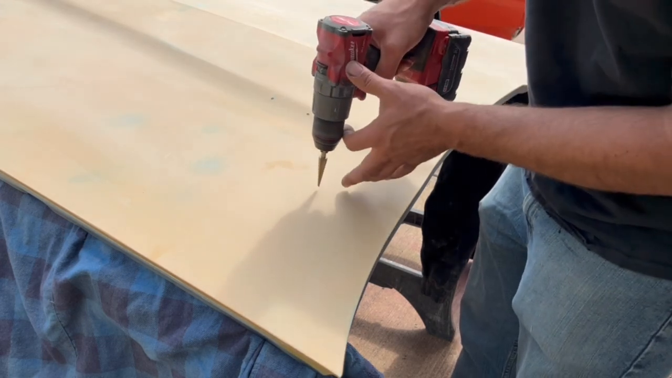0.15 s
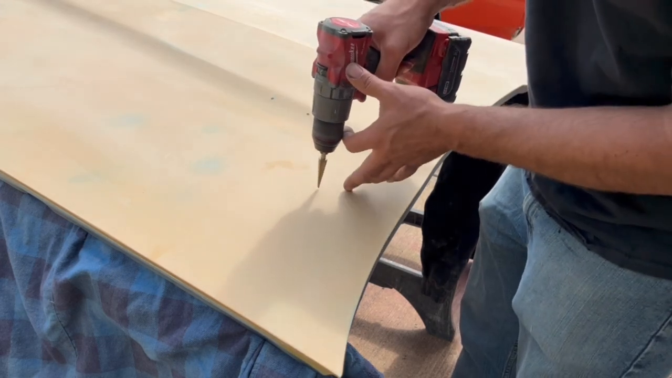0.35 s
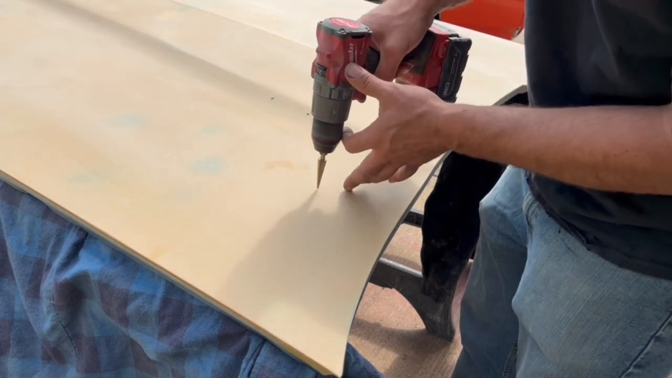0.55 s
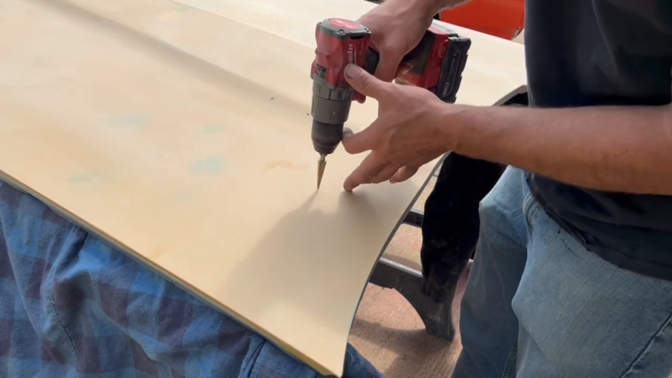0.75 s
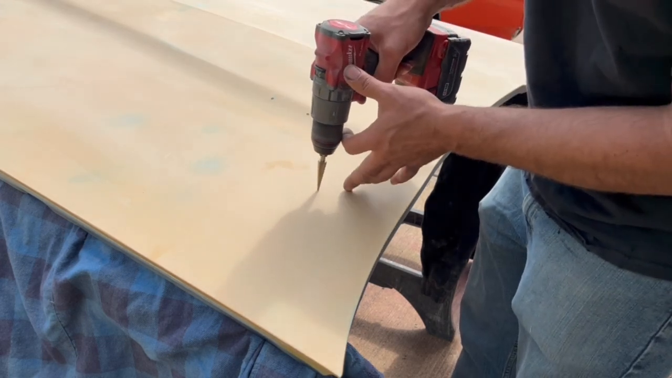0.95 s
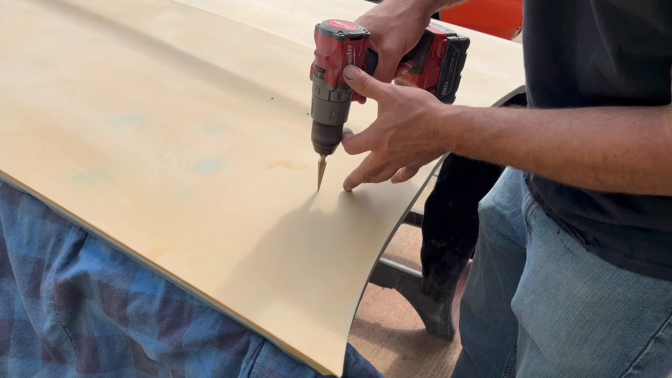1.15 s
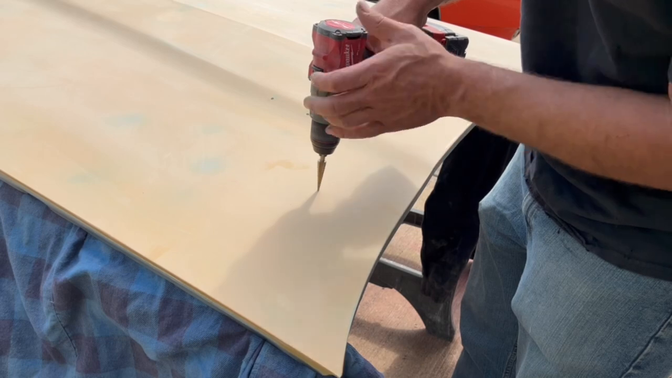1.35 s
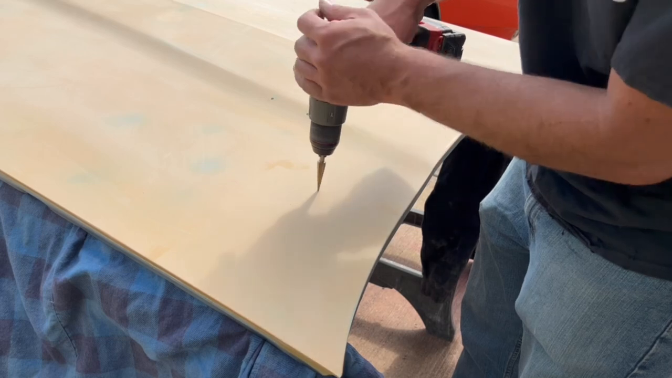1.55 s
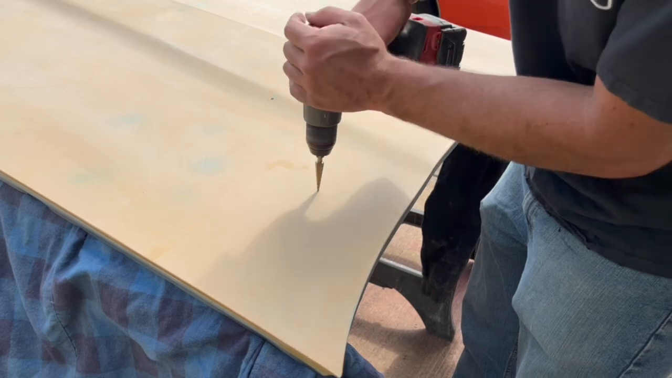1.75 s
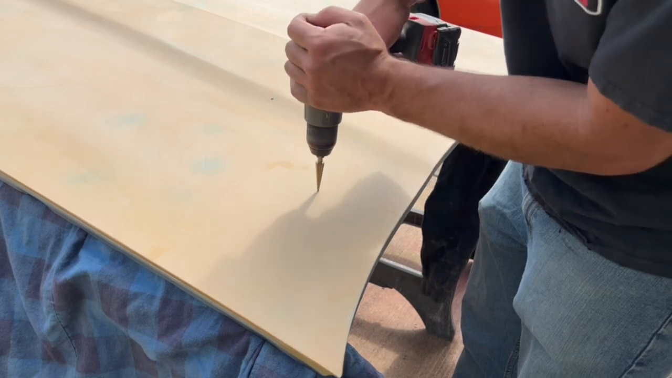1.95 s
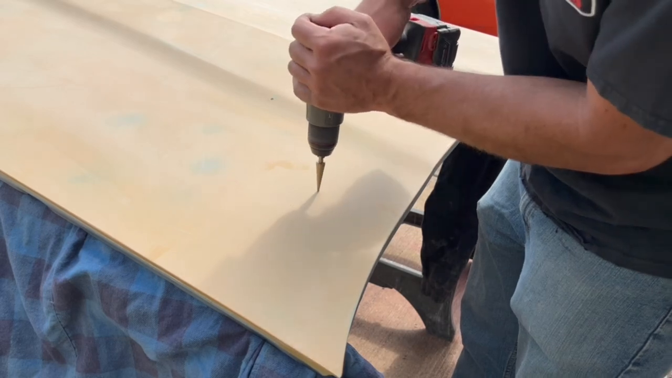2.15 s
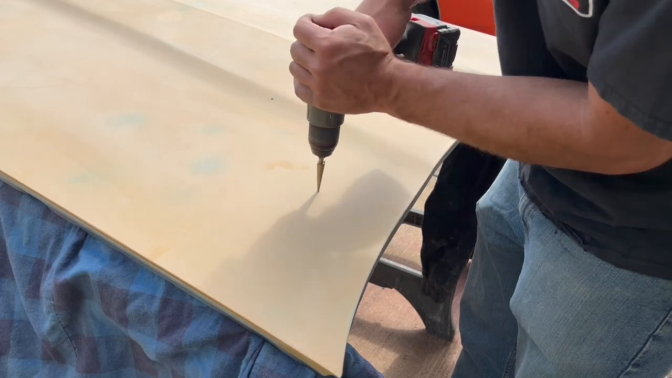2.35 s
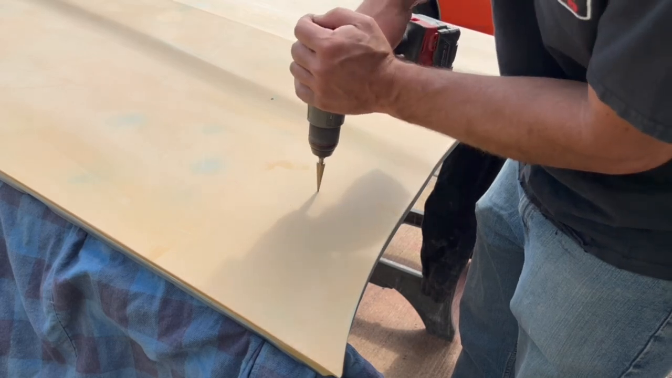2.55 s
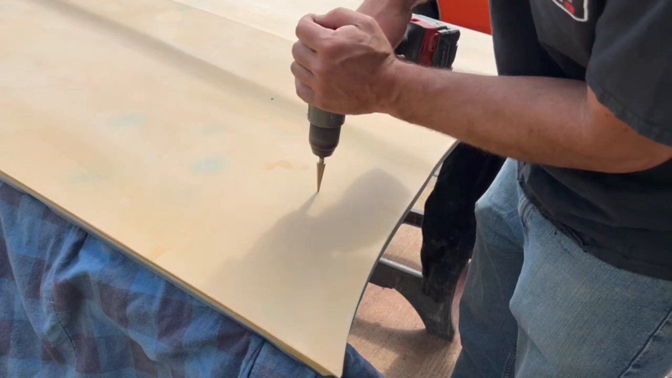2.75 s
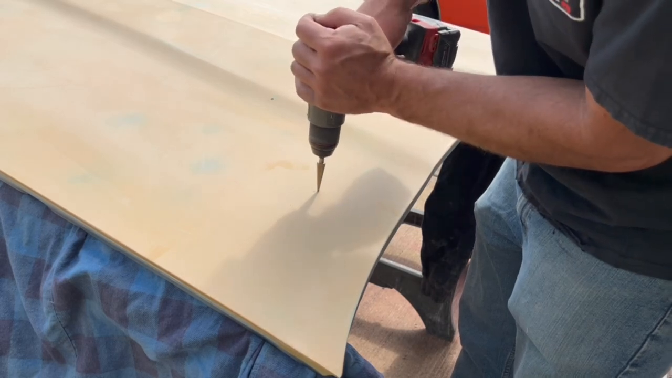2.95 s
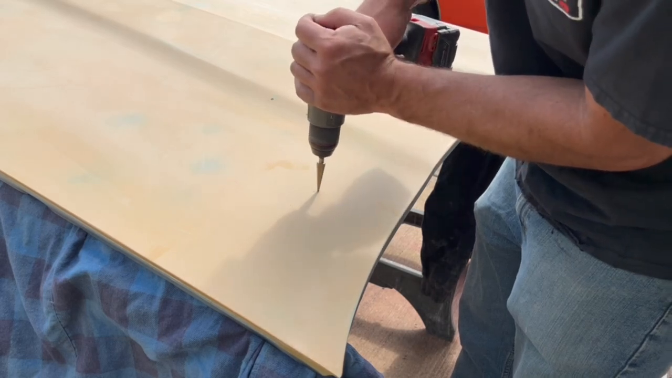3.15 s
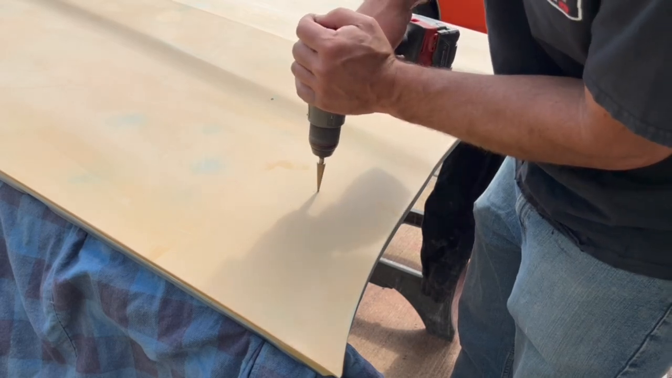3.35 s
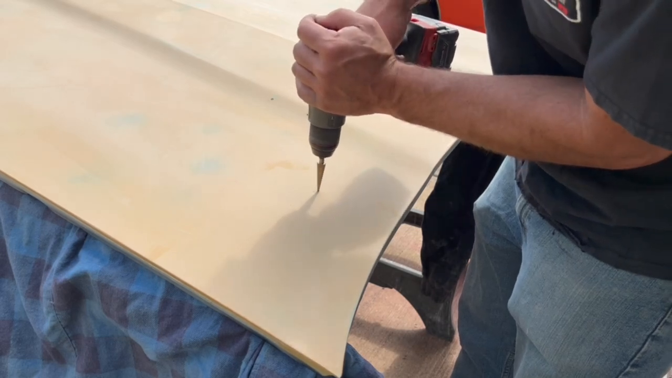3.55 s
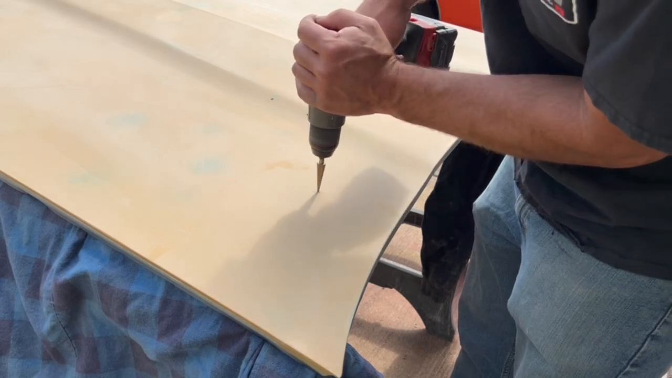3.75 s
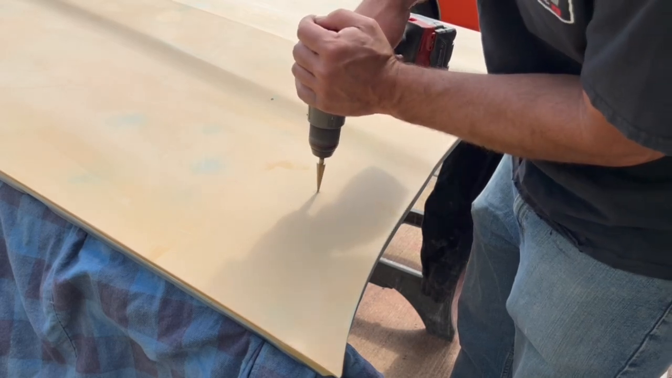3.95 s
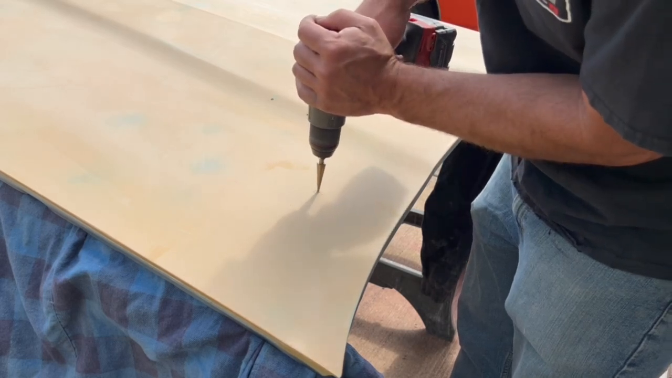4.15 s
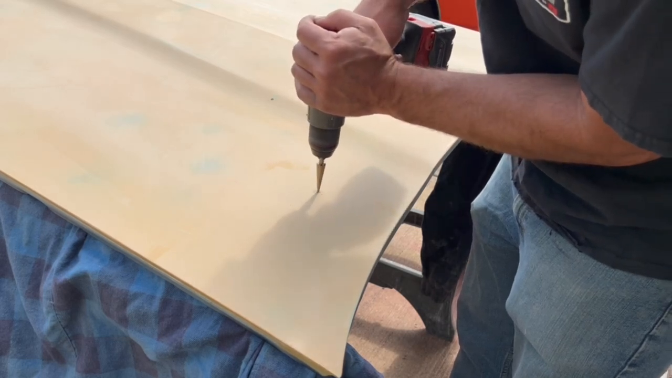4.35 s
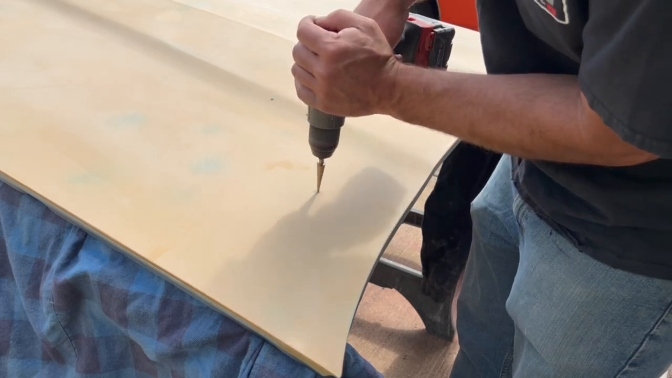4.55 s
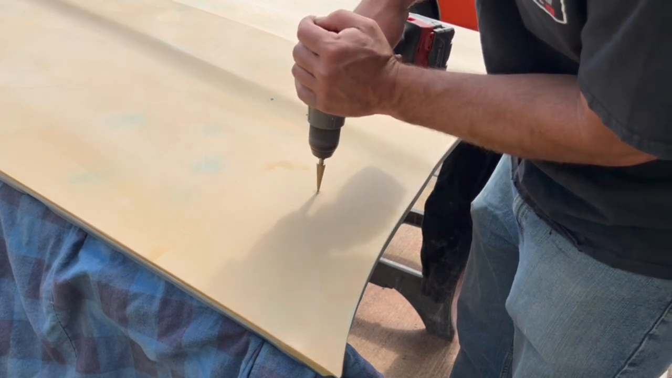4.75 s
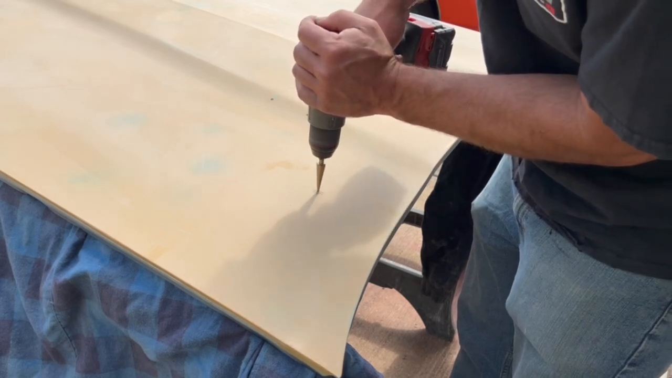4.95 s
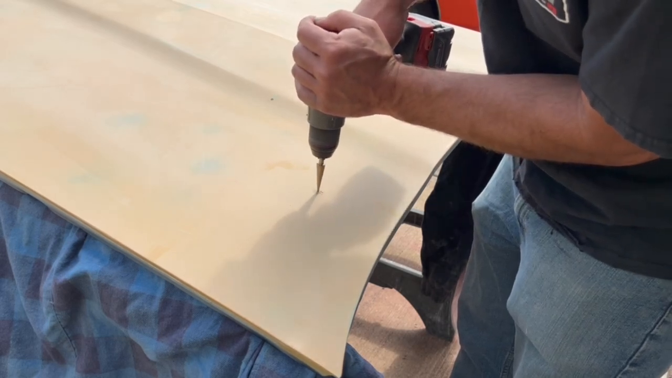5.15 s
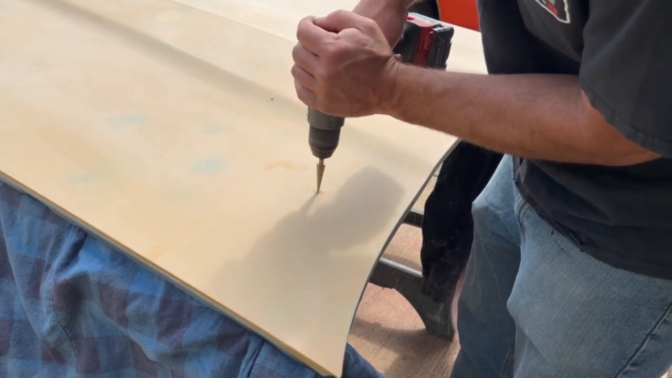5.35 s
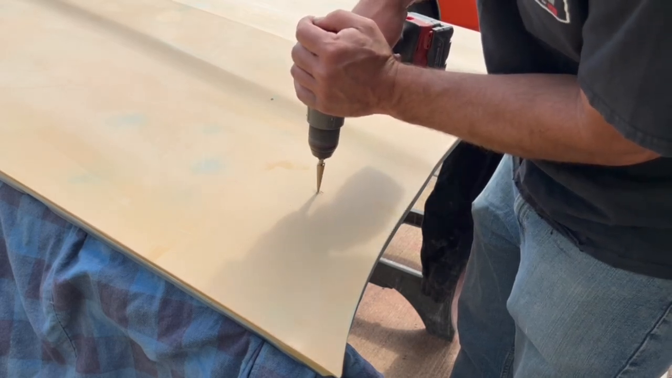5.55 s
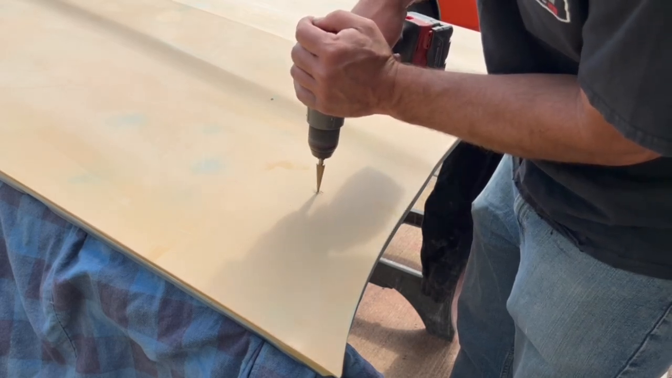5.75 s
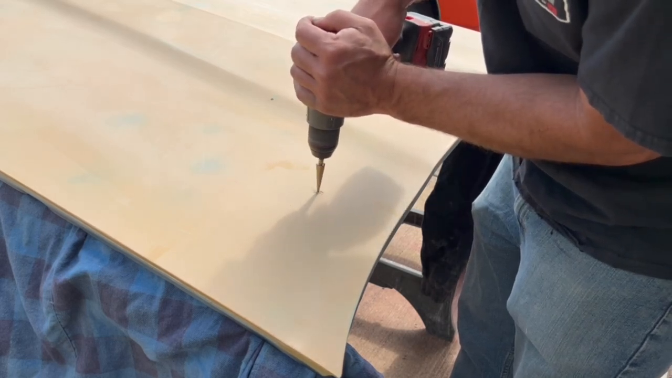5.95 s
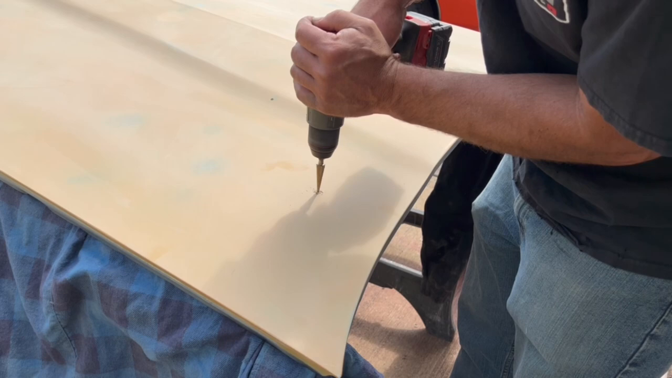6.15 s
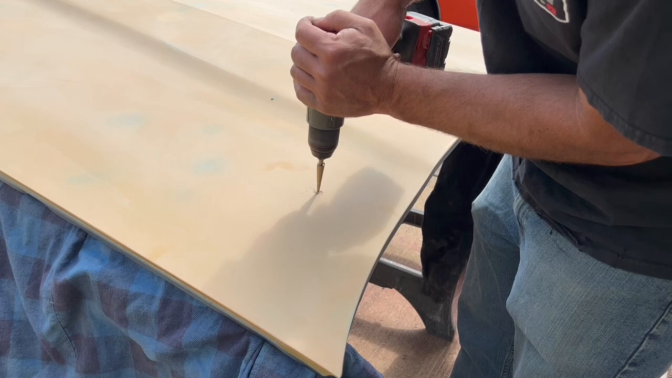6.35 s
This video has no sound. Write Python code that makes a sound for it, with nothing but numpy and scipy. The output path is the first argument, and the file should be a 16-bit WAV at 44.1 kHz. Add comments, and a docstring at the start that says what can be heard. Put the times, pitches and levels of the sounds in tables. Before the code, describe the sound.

Small birds chirp outside a quiet garage, then a cordless drill clicks on, whines up fast, and bites into a steel panel, sagging slightly.

```python
"""Small birds chirp outside an open garage over a low rumble and a hum; then a brushless drill spins up.
It whines, bites into a sheet-steel panel with a step bit and slows, while the panel rumbles.
Birds are gliding tones and hoarse noise. The motor is tones locked to the shaft angle and to its switching
drive. Rumble, hiss, gear noise and rattle are coloured noise, and a fine crackle is noise in bursts."""
import sys
import numpy as np
from scipy import signal
from scipy.fft import rfft, irfft, next_fast_len
from scipy.io import wavfile
from scipy.ndimage import map_coordinates

SR = 44100
rng = np.random.default_rng(int(sys.argv[2]) if len(sys.argv) > 2 else 0)


def transcribe(signal):
    """Save signal, clipped to [-1, 1], as a 16-bit WAV file at the path in sys.argv[1]."""
    frames = np.atleast_2d(signal).T
    limited = np.clip(frames, -1, 1)
    pcm = np.round(limited * 32767).astype(np.int16)
    wavfile.write(sys.argv[1], SR, pcm)


N = 282107
T = np.arange(N) / SR  # s
SIDES = np.array([[.5], [-.5]])  # left, right halves of a stereo difference

# Outdoor rumble. Each row: frequency in Hz, relative level in dB.
OUTSIDE = [(15, -59), (25, -22), (41, -11), (71, 2), (174, -10), (209, -10.5), (250, -19.5), (331, -20),
           (604, -29.5), (655, -24.5), (784, -25), (902, -27), (3000, -44), (3900, -67), (6600, -120)]
# Faint high air. Each row: frequency in Hz, relative level in dB.
AIR = [(1500, -41), (3000, -5), (4500, -8), (6500, -17), (9000, -16), (15000, -24)]
# Tones of the hum. Each row: frequency in Hz, level in dB.
HUM = [(124, -51.5), (201, -51.5)]
# Reverberation of the garage. Each row: frequency in Hz, decay time over 60 dB in s.
GARAGE = [(200, 0.71), (3000, 0.75), (6000, 0.35), (9000, 0.41), (14000, 0.15)]
# Stereo image by frequency, opposite in phase around 9-10 kHz. Each row: frequency in Hz,
# phase by which left leads in rad, likeness 0-1, left over right in dB.
STEREO = [(100, 0, 0.96, 1), (362, 1.05, 0.99, 3), (764, -1, 0.9, 1.5), (1330, 0.35, 0, -.5),
          (2270, 1.22, 0.98, 0), (4100, 1.67, 0.67, 1.5), (4440, 1.74, 0.8, 4), (5900, 1.1, 0.6, -2),
          (6800, 0.9, 0.74, 1), (8020, 1.45, 1, 3.5), (8680, np.pi, 1, 1), (10750, np.pi, 1, 0.5),
          (11370, 5.5, 1, -0.5), (13100, 2 * np.pi, 1, 0), (15000, 9, 0.98, -0.5)]

# Chirps of the near bird. Each row: time of the top in s, top in Hz, rise in s, fall in s, relative level in dB.
CHIRPS = [(.138, 5270, .014, 0.037, -51), (.549, 5450, 0.012, 0.032, -44.5),
          (.688, 5680, 0.019, 0.022, -48.5), (1.055, 5550, 0.018, .036, -37),
          (1.136, 5570, 0.0055, .026, -38), (1.687, 5530, .006, 0.036, -36)]
# Shape of every chirp. Each row: stage (-1 start, 0 top, 1 end of the fall), Hz below the top, loudness 0-1.
CHIRP_SHAPE = [(-1, 2200, 0.08), (-0.43, 1248, 0.09), (-.3, 348, 0.6), (0.025, -1, 0.74), (.35, 180, 1),
               (.65, 420, 0.68), (1, 798, 0.13), (1.2, 1502, 0.04)]
# Soft hoarse notes. Each row: time in s, centre in Hz, half length in s, slide in Hz per s, relative level in dB.
CHEEPS = [(0.231, 3700, .018, 24000, -63), (0.247, 4910, .008, 30000, -60), (0.272, 4450, 0.021, 0, -65.5),
          (.47, 3530, .02, -2, -71), (.61, 4970, .008, -1, -58), (0.65, 3900, .012, 40000, -63),
          (0.675, 4870, .022, -0.5, -52.5), (0.703, 4720, .013, -35000, -54),
          (0.765, 3470, 0.018, 20000.5, -59.5), (0.782, 4860, 0.022, -0.5, -57.5),
          (0.935, 3380, .022, -4000, -62), (1.035, 5200, 0.0098, 20000, -51),
          (1.117, 5360, 0.011, 11998, -50), (1.14, 3150, .011, 5998, -58), (1.256, 4880, 0.015, -0.5, -54),
          (1.642, 3750, .008, 80000, -60), (1.644, 6200, .022, -4000, -54), (1.668, 5220, 0.017, -1, -46.5),
          (1.727, 4850, .012, -25000, -48.5), (1.741, 3200, .008, 0, -61), (1.801, 3450, .006, 24999, -61)]
# Hoarse part of a chirp. Each row: frequency in Hz, relative level in dB.
RASP = [(2300, -36), (3200, -7), (4200, -3), (5200, 2), (6200, -3), (7200, -21), (10000, -21), (15000, -45)]
# What the walls return of the song. Each row: frequency in Hz, gain in dB.
WALLS = [(3000, 0), (4000, 1), (4700, 4.5), (5100, -3), (5600, -3)]

# Trigger and first kick of the motor. Each row: time in s, level in dB.
CLICKS = [(1.983, -45.5), (2.026, -39)]
# Housing when knocked. Each row: frequency in Hz, relative level in dB.
KNOCK = [(800, -29), (1700, -25), (2200, -5), (2850, 5), (3150, -25), (6500, -30), (15000, -38)]

# Shaft speed after the soft start, sagging as the bit bites. Each row: time in s, turns per s.
SHAFT_SPEED = [(2.5, 261), (2.55, 278.5), (2.6, 286.2), (2.72, 291.8), (2.85, 296.6), (3.65, 296.5),
               (3.8, 293.1), (4.07, 291.9), (4.28, 290), (4.58, 285.7), (4.7, 285.3), (4.78, 283),
               (5.17, 281.8), (5.26, 279), (5.46, 281.2), (5.56, 279.2), (5.72, 279.5), (6.02, 276.4),
               (6.25, 276.5), (6.39, 274.2)]
# Noise of the panel. Each row: frequency in Hz, relative level in dB.
PANEL = [(25, -51), (45, -26), (75, 0.5), (110, 6), (160, -9.5), (205, -10.5), (300, 2), (440, -2.5),
         (580, 2.5), (760, -3.5), (1050, -4), (1300, -12), (2000, -37), (4000, -74)]
# Ringing modes of the steel sheet. Each row: frequency in Hz, boost in dB.
PANEL_MODES = [(150, 7), (177, 8.5), (238, 2.5), (322, 5.5), (342, 5.5), (376, 3.5), (393, 5), (441, 9.5),
               (472, 6), (555, 2), (763, 3.5), (812, 4), (965, 5)]
# Noise of the gears. Each row: frequency in Hz, relative level in dB.
GEARBOX = [(500, -14.5), (1300, -5.5), (1800, 0), (2350, -2), (2650, 1), (3400, 1), (4200, -1), (5000, -5),
           (7000, -17), (15000, -19)]
# High hiss of the running drill. Each row: frequency in Hz, relative level in dB.
HISS = [(3000, -57), (5000, -12), (5600, -1.5), (6300, 1), (6850, -1), (7300, -10.5), (8500, -11),
        (9500, -12), (11000, -16.5), (13200, -13.5), (15000, -18.5), (15800, -64)]
# Rattle of the housing. Each row: frequency in Hz, relative level in dB.
RATTLE = [(300, -10), (800, 18), (1300, -31), (2000, 19.5), (2450, 21), (2800, 30.5), (2950, 27), (3120, 9),
          (4500, -8), (15000, -2)]
# Fine crackling grain of the running drill. Each row: frequency in Hz, relative level in dB.
CRACKLE = [(700, -14), (1600, -2), (2400, -2), (3400, 1), (4800, -2), (6200, 3), (7400, -13), (13000, -17),
           (15000, -26)]

# Unbalance meeting narrow panel resonances. Each row: shaft speed in Hz, relative level in dB.
THROB = [(200, -71), (275, -39), (276.8, -41.5), (279.5, -33.5), (283, -36), (284.5, -39), (286.5, -34),
         (289.8, -49.5), (291.5, -41), (297, -42)]
# Shaft overtones. Each row: multiple of shaft speed, relative level in dB running light, the same under load.
OVERTONES = [(2, -40.5, -46.5), (3, -48, -62), (4, -45, -44.5), (5, -46, -51.5), (10, -38.5, -43.5),
             (12, -50, -45), (13, -35.3, -46.5)]
# Gear mesh lines. Each row: multiple of shaft speed, relative level in dB running light, the same under load.
GEARS = [(.2715, -57, -45.5), (.398, -59, -44.5), (1.15, -52, -45), (4.048, -52.5, -51), (12.2, -53, -54),
         (14.36, -66, -55), (16.46, -59, -49), (19.57, -45, -46.5), (20.38, -41.5, -48.5),
         (20.47, -43.5, -41), (22.36, -58, -50), (23.4, -57, -52), (41.1, -54, -64)]
# Standing waves met by the strongest lines, keyed by rounded multiple of shaft speed.
# Each row: shaft speed in Hz, gain in dB.
GEAR_WAVES = { "2": [(275, 0), (279, -2.5), (286, -2), (289, 5), (296.5, -0.5)], "4": [(276.5, 2),
              (278.5, -3), (282, 1), (285, -4), (287.5, 3.5), (290.3, -7.5), (293, -1)], "10": [(274, -4),
              (276.8, 3.5), (279, -8), (281.5, 6), (283, 3), (285.5, 6), (289.7, -7), (291.8, -4),
              (293.3, -16), (296.5, 0)], "13": [(274, -4), (277, 1), (279.3, 2), (282, 3), (286, -6),
              (289, -17), (292.2, 6), (293.5, -3), (296.5, 0.5)]}
# Magnetic pull. Each row: multiple of shaft speed, relative level in dB at full current.
POLES = [(4, -43.5), (5, -48), (8, -59), (10, -62), (12, -58), (16, -50.5), (20, -48), (28, -48.5),
         (32, -54)]
# Switching sidebands. Each row: multiple of the switching rate, multiple of shaft speed added,
# relative level in dB, change under full load in dB.
SIDEBANDS = [(1, -4, -41, -2.5), (1, 4, -36, 2), (1, 8, -45.5, -9), (1, -8, -51, 4.5), (1, -20, -54, -6),
             (1, -32, -59, -30)]
# Tone colour of the motor lines, faint just above 9 kHz. Each row: frequency in Hz, gain in dB.
MOTOR_COLOUR = [(350, -8), (520, -7), (620, -15), (760, 3.5), (1000, 4), (1200, -0.5), (1350, -9),
                (1700, 1), (2050, 14.5), (2400, 19), (2700, 24.5), (2900, 25), (3100, -1), (3600, 2),
                (4600, -9), (5900, 2), (6500, 12), (6780, 2.5), (8850, 2.5), (9100, -8.5), (9200, -18),
                (15000, -12)]
# Standing waves met by the whine. Each row: whine in Hz, left over right in dB, gain common to both in dB.
WHINE_WAVES = [(2200, -4, -3), (2184, 0, -5.5), (2216, -9, -4.5), (2230, -3, -3.5), (2255, -8, -3.5),
               (2300, 8, -3), (2290, 1.5, -3), (2340, 0, -3.5), (2345, -4, -3), (2356, -2.5, 0)]

TOP_HZ = 15750
# birds
CHIRP_ROUGH, CHEEP_ROUGH = .014, .05  # trembling, share of pitch
RASP_DB, RASP_LEAD_S, RASP_FADE_S = -62.5, 0.032, 0.076  # hoarseness around each chirp
WHISTLE_S, WHISTLE_HALF_S, WHISTLE_DB = 1.46, 0.096, -64  # one thin far note
WHISTLE_HZ, WHISTLE_HZ_PER_S = 4750, 1400  # it bends upward
SONG_FLUTTER_DB = 1.2
BIRD_BALANCE_DB, BIRD_LEAD_S = 7.5, 0.00022  # left over right; lead of the song on the left
ECHO_S, ECHO_DB = 0.16, -21  # a far wall returns the song
# drive
TRIGGER_S, START_S = 1.981, 2.03  # the drive switches on; the shaft begins to turn
SPIN_UP_HZ_PER_S = 562
SURGE_ATTACK_S, SURGE_HOLD_S, SURGE_RELEASE_S = 0.34, 0.3, 0.084  # current drawn to spin up
IDLE_CURRENT, LOAD_CURRENT = 0.2, 0.055  # shares of the surge: running light, added by full pressure
BITE_S, BITE_TAKES_S = 3.667, 0.092  # the tip breaks into the steel
FULL_SAG, SAG_POWER = 0.074, 0.47  # share of speed lost at full pressure; how pressure follows that loss
GEAR_RATIO, PLANET_ORDER = 21, .073  # shaft turns per spindle turn; planet gear turns per shaft turn
# noise: level at full speed (dB), growth with speed (power), change under full pressure (dB)
PANEL_DB, PANEL_POWER, PANEL_LOAD_DB = -38.5, 0.83, 2.5
GEAR_DB, GEAR_POWER, GEAR_LOAD_DB = -35, 1.25, -0.5
HISS_DB, HISS_POWER, HISS_LOAD_DB = -32.5, 1.9, -1
CRACKLE_DB, CRACKLE_POWER, CRACKLE_LOAD_DB = -40.5, 3, 1.5
FULL_NOISE_PACE = 0.73  # share of full speed at which gears, hiss and crackle stop growing with speed
MODE_WIDTH_HZ, MODE_WIDTH_SHARE = 4.6, 0.0066  # half width of a mode: base plus share of its frequency
HISS_WAVER_DB, HISS_DRIFT_DB, PLANET_DB = 1.1, 0.5, 0.36  # uneven hiss: quick, slow, per planet gear turn
RATTLE_DB = -34.5  # at full current
CRACKLE_PER_S, CRACKLE_DECAY_S, CRACKLE_SCATTER_DB = 300, .0012, 1.8  # rate is at full speed
# motor tones
THROB_LAG_S = 0.018  # the resonance takes time to build up
GEAR_SLOW_DB, GEAR_SLOW_ORDER = -190, 5  # fade with lost speed, running light; steeper above this order
GEAR_PULSE_DB, GEAR_PULSE_ORDER = 3.2, 11  # swell per spindle turn; weaker above this order
MESH_ORDER, MESH_DB, MESH_HZ, MESH_WIDTH_HZ = 29.6, -33.5, 6570, 410  # high mesh, one resonance
SWITCH_HZ = 8008
WHINE_ORDER, WHINE_DB, WHINE_BITE_DB = 8, -22.5, -1  # before standing waves; change once the bit bites
WHINE_SLOW_DB, WHINE_SLOW_POWER = -165, 1.97  # fade with the shortfall in speed
SHAKE, SHAKE_LOAD = .045, .075  # running light; added at full pressure


def amp(db):
    """Decibels to gain."""
    return 10 ** (np.asarray(db) / 20)


def unit(x):
    """x at rms 1."""
    return x / np.sqrt(np.mean(x ** 2) + 1e-20)


def along(points, hz, axis=1):
    """One column of (Hz, ..) points, interpolated on a log axis."""
    points = np.array(points, float)
    return np.interp(np.log(np.abs(hz) + 1), np.log(points[:, 0] + 1), points[:, axis])


def wobble(rate_hz):
    """A smooth random curve with rate_hz knots a second."""
    knots = rng.standard_normal(int(N * rate_hz / SR) + 4)
    return map_coordinates(knots, [T * rate_hz], order=2)


def swell(s, half_s):
    """A smooth rise and fall around a moment."""
    return np.exp(-((T - s) / half_s) ** 2)


def ramp(s, length_s):
    """0 before s, rising to 1 over length_s."""
    return np.clip((T - s) / length_s, 0, 1)


def random_phase():
    """An angle anywhere on the circle, in rad."""
    return rng.uniform(0, 2 * np.pi)


def filtered(x, response):
    """x through a complex response of frequency."""
    size = next_fast_len(N + 8192)
    return irfft(rfft(x, size) * response(np.fft.rfftfreq(size, 1 / SR)), size)[..., :N]


def stereo(hz):
    """Left and right gain and phase by frequency."""
    return amp(SIDES * along(STEREO, hz, axis=3)) * np.exp(1j * SIDES * along(STEREO, hz, axis=1))


def rush(spectrum, bursts=1):
    """Coloured stereo noise of rms 1, steady or excited in bursts, partly alike left and right."""
    def mid_side(hz):
        turn = np.arccos(np.clip(along(STEREO, hz, axis=2), 0, 1)) / 2  # sets the likeness
        return amp(along(spectrum, hz)) * [np.cos(turn), np.sin(turn)]

    mid, side = filtered(bursts * rng.standard_normal((2, N)), mid_side)
    return unit(filtered(np.array([mid + side, mid - side]), stereo))


def line(phase, drift_db, flutter):
    """A tone of rms near 1 that drifts in level and flutters quickly in phase."""
    level = np.sqrt(2) * amp(drift_db * wobble(7))
    return level * np.sin(phase + flutter * wobble(110) + random_phase())


def garage(x):
    """The walls' diffuse answer: noise decaying at a rate set by frequency, different in each ear."""
    hz, t, z = signal.stft(rng.standard_normal((2, SR // 2)), SR, nperseg=256)
    decay = amp(-60 * t / along(GARAGE, hz)[:, None])
    tail = signal.istft(z * decay, SR, nperseg=256)[1]
    return signal.fftconvolve(x[None], tail / np.linalg.norm(tail[0]), axes=1)[:, :N]


def background():
    """Outdoor rumble and faint high air as drifting noise, and a tonal hum that stops early on."""
    hum = sum(amp(db) * line(2 * np.pi * hz * T, drift_db=1.5, flutter=0.15) for hz, db in HUM)
    hum *= np.clip((1.35 - T) / 0.05, 0, 1)
    air = amp(-77.5 + 2.5 * wobble(7)) * rush(AIR)
    rumble = amp(-47.5 + 1.66 * wobble(8.37)) * rush(OUTSIDE)
    return rumble + air + filtered(hum, stereo)


def note(hz, rough):
    """A bird's tone of rms 1 whose pitch trembles."""
    return np.sqrt(2) * np.sin(2 * np.pi * np.cumsum(hz * (1 + rough * wobble(900))) / SR)


def chirps():
    """Notes that flick up and slide down, and the envelope of the hoarseness around them."""
    song, hoarse = np.zeros(N), np.zeros(N)
    stages, below_hz, loudness = np.transpose(CHIRP_SHAPE)
    for s, top_hz, rise_s, fall_s, db in CHIRPS:
        stage = (T - s) / np.where(T < s, rise_s, fall_s)
        level = amp(db) * np.interp(stage, stages, loudness, left=0, right=0)
        song += level * note(top_hz - np.interp(stage, stages, below_hz), rough=CHIRP_ROUGH)
        hoarse += amp(RASP_DB) * np.exp(-np.abs(T - s) / np.where(T < s, RASP_LEAD_S, RASP_FADE_S))
    return song, hoarse


def birds():
    """Chirps, cheeps and a whistle, direct and returned by the walls; the whole is weighted to the left."""
    song, hoarse = chirps()
    for s, hz, half_s, slide_hz_per_s, db in CHEEPS:
        song += amp(db) * swell(s, half_s) * note(hz + slide_hz_per_s * (T - s), rough=CHEEP_ROUGH)
    whistle_hz = WHISTLE_HZ + WHISTLE_HZ_PER_S * (T - WHISTLE_S)
    song += amp(WHISTLE_DB) * swell(WHISTLE_S, WHISTLE_HALF_S) * note(whistle_hz, rough=0.024)
    song *= amp(SONG_FLUTTER_DB * wobble(200))
    rasp = hoarse * rush(RASP)
    direct = filtered(song, lambda hz: np.exp(2j * np.pi * hz * BIRD_LEAD_S * SIDES)) + rasp
    returned = filtered(song + rasp[0], lambda hz: amp(along(WALLS, hz)))
    echo = amp(ECHO_DB) * garage(np.interp(T - ECHO_S, T, returned))
    return amp(BIRD_BALANCE_DB * SIDES) * (amp(-1.0) * direct + amp(-6.5) * garage(returned) + echo)


def clicks():
    """Short knocks that ring the drill's housing, and a soft rub as the hand takes its grip."""
    blows = sum(amp(db - 60 * np.abs(T - s) / 0.022) * (T >= s) for s, db in CLICKS)
    touch = amp(-67) * swell(1.31, 0.027)
    grip = amp(-58) * swell(1.576, 0.15)
    rub = rush([(150, -27), (300, -3.0), (430, -12), (700, -19), (4000, -31.5)])  # Hz, relative dB
    return (blows + touch) * rush(KNOCK) + grip * rub


def sheet(hz):
    """Gain of the steel sheet's narrow resonances."""
    def peak(mode_hz):
        return np.exp(-((hz - mode_hz) / (MODE_WIDTH_HZ + MODE_WIDTH_SHARE * mode_hz)) ** 2)

    return amp(sum(db * peak(mode_hz) for mode_hz, db in PANEL_MODES))


def crackles(per_s):
    """Envelope of tiny bursts at random moments, each sudden and quickly gone."""
    scatter_db = CRACKLE_SCATTER_DB * np.clip(rng.standard_normal(N), -2, 2)
    sizes = (rng.random(N) < per_s / SR) * amp(scatter_db)
    return signal.lfilter([1], [1, -np.exp(-1 / (CRACKLE_DECAY_S * SR))], sizes)


def running_noise(angle, pace, load, current):
    """Panel rumble, gear noise, hiss and crackle that grow with speed, and a rattle that follows current."""
    drive = np.minimum(pace / FULL_NOISE_PACE, 1)
    spindle = np.sin(angle / GEAR_RATIO)
    # the hiss wavers slightly each spindle turn
    waver_db = (-0.1 + .5 * load) * wobble(500) + .3 * spindle + PLANET_DB * np.sin(PLANET_ORDER * angle)
    waver_db += HISS_WAVER_DB * wobble(45) + HISS_DRIFT_DB * wobble(7)
    teeth = unit(amp(1.0 * np.sin(angle) + 0.83 * wobble(300) + .4 * spindle))
    panel_level = amp(PANEL_DB + PANEL_LOAD_DB * load ** 2 + 0.19 * wobble(24.9)) * pace ** PANEL_POWER
    panel = panel_level * unit(filtered(rush(PANEL), sheet))
    gears = amp(GEAR_DB + GEAR_LOAD_DB * load) * drive ** GEAR_POWER * teeth * rush(GEARBOX)
    hiss = amp(HISS_DB + HISS_LOAD_DB * load) * drive ** HISS_POWER * unit(amp(waver_db)) * rush(HISS)
    # torque ripple rattles the housing, mostly while the motor accelerates
    rattle = amp(RATTLE_DB) * ramp(START_S, 0.052) * current * teeth * rush(RATTLE)
    crackle_level = amp(CRACKLE_DB + CRACKLE_LOAD_DB * load) * drive ** CRACKLE_POWER
    crackle = crackle_level * rush(CRACKLE, bursts=crackles(CRACKLE_PER_S * pace))
    return panel + gears + hiss + rattle + crackle


def shaft_throb(angle, speed, pace):
    """The shaft's unbalance, strong where its speed meets a panel resonance."""
    level_db = along(THROB, np.interp(T - THROB_LAG_S, T, speed))
    return amp(level_db) * pace * line(angle, drift_db=1.0, flutter=0.27)


def gear_lines(angle, speed, pace, bite, load):
    """Overtones and mesh tones locked to the shaft, swelling once a spindle turn, the low ones most."""
    lines = np.zeros(N)
    for order, light_db, loaded_db in [(round(k), light, heavy) for k, light, heavy in OVERTONES] + GEARS:
        loaded = bite if order > 2 else load ** 2  # the lowest change gradually with pressure, others at the bite
        swell_db = GEAR_PULSE_DB * min(GEAR_PULSE_ORDER / order, 1)
        swell_db = swell_db * np.sin(angle / GEAR_RATIO + random_phase())
        slow_db = GEAR_SLOW_DB * max(order / GEAR_SLOW_ORDER, 1) * (1 - pace)
        level_db = (1 - loaded) * (light_db + slow_db) + loaded * loaded_db
        waves = GEAR_WAVES.get(str(round(order)))
        if waves:
            level_db = level_db + bite * along(waves, speed)
        tone = line(order * angle, drift_db=0.7 + 0.5 * load, flutter=0.13 + 0.16 * load)
        lines += amp(level_db + swell_db) * tone
    return lines


def magnetic_pull(angle, speed, pace, current):
    """Magnetic orders that follow the current, flaring and fading as their pitch sweeps the tone colour."""
    lines = np.zeros(N)
    for k, db in POLES:
        order = round(k)
        level = amp(db + along(MOTOR_COLOUR, order * speed)) * current ** 2 * np.minimum(4 * pace, 1)
        lines += level * line(order * angle, drift_db=.6, flutter=0.1)
    return lines


def high_mesh(angle, speed, current):
    """A high gear mesh that sings under torque as it sweeps through one resonance."""
    resonance = np.exp(-((MESH_ORDER * speed - MESH_HZ) / MESH_WIDTH_HZ) ** 2)
    return amp(MESH_DB) * resonance * current * line(MESH_ORDER * angle, drift_db=.6, flutter=0.1)


def switching_sidebands(angle, speed, pace, load):
    """Tones at the drive's switching rate, shifted by multiples of the shaft speed."""
    lines = np.zeros(N)
    switching = ramp(TRIGGER_S, 0.03) * (0.072 + 0.81 * pace)
    for m, k, db, load_db in SIDEBANDS:
        gain = amp(db + load_db * load + along(MOTOR_COLOUR, m * SWITCH_HZ + k * speed))
        phase = 2 * np.pi * m * SWITCH_HZ * T + k * angle
        lines += gain * switching * line(phase, drift_db=0.5, flutter=0.12 + .35 * load)
    return lines


def motor(angle, speed, pace, bite, load, current):
    """All motor lines but the main whine, with a faint answer of the garage."""
    lines = shaft_throb(angle, speed, pace) + gear_lines(angle, speed, pace, bite, load)
    lines += magnetic_pull(angle, speed, pace, current) + high_mesh(angle, speed, current)
    lines += switching_sidebands(angle, speed, pace, load)
    return filtered(lines + amp(-20) * garage(lines), stereo)


def whine(angle, speed, pace, bite, load):
    """The motor's main tone: it grows with speed, drops at the bite and slides through standing waves."""
    # planet gears beat against the whine and it shakes, both more under load
    beat = (0.011 + 0.056 * load) * amp(2.26 * wobble(6.3)) * np.sin(0.4 * angle + 0.76 * wobble(25))
    shake = (SHAKE + SHAKE_LOAD * load) * (wobble(170) + 1j * wobble(170))
    tone = np.exp(1j * WHINE_ORDER * angle) * (1 + beat + shake)
    level_db = WHINE_DB + WHINE_SLOW_DB * (1 - pace) ** WHINE_SLOW_POWER
    level_db += WHINE_BITE_DB * bite + 0.52 * load * wobble(12)
    level_db += along(WHINE_WAVES, WHINE_ORDER * speed, axis=2)
    balance_db = SIDES * along(WHINE_WAVES, WHINE_ORDER * speed)
    return np.sqrt(2) * amp(level_db + balance_db) * np.real(tone * np.exp(.5j * SIDES))


def drill():
    """The shaft ramps up on a surge of current, then slows as the bit bites; lost speed tells the pressure."""
    running = np.interp(T, *np.transpose(SHAFT_SPEED))
    speed = np.clip(SPIN_UP_HZ_PER_S * (T - START_S), 0, running)
    pace = speed / speed.max()
    bite = ramp(BITE_S, BITE_TAKES_S)
    load = bite * np.minimum((1 - pace) / FULL_SAG, 1) ** SAG_POWER
    release = ramp(TRIGGER_S + SURGE_ATTACK_S + SURGE_HOLD_S, SURGE_RELEASE_S)
    surge = ramp(TRIGGER_S, SURGE_ATTACK_S) * (1 - release)
    current = np.maximum(surge, pace * (IDLE_CURRENT + LOAD_CURRENT * load))
    jitter = 1 + 0.000645 * load * wobble(25)
    angle = 2 * np.pi * np.cumsum(speed * jitter) / SR
    tones = whine(angle, speed, pace, bite, load) + motor(angle, speed, pace, bite, load, current)
    return tones + running_noise(angle, pace, load, current)


def scene():
    """Rumble and birds further off, the drill close by."""
    return background() + birds() + clicks() + drill()


def record(dry):
    """The recorder keeps nothing above its band limit."""
    return filtered(dry, lambda hz: hz < TOP_HZ)


dry = scene()
out = record(dry)
transcribe(out)
```